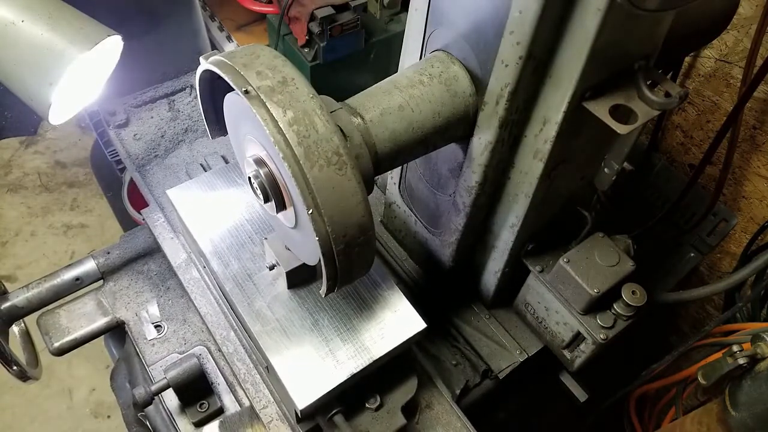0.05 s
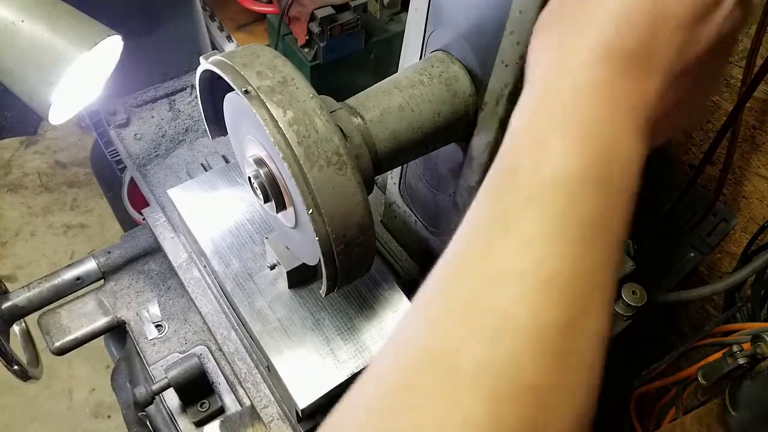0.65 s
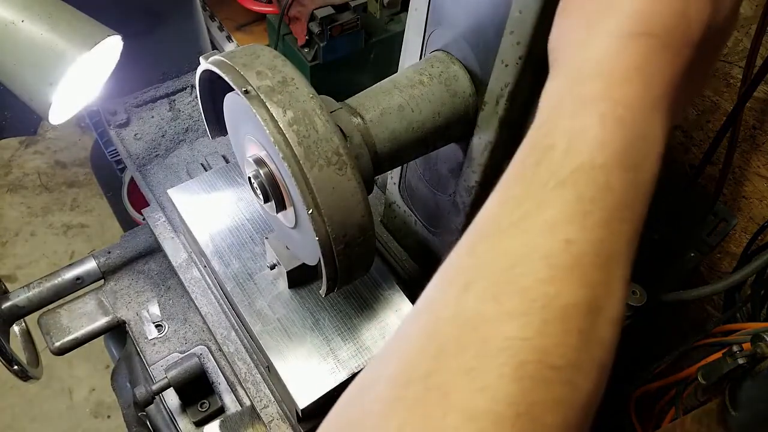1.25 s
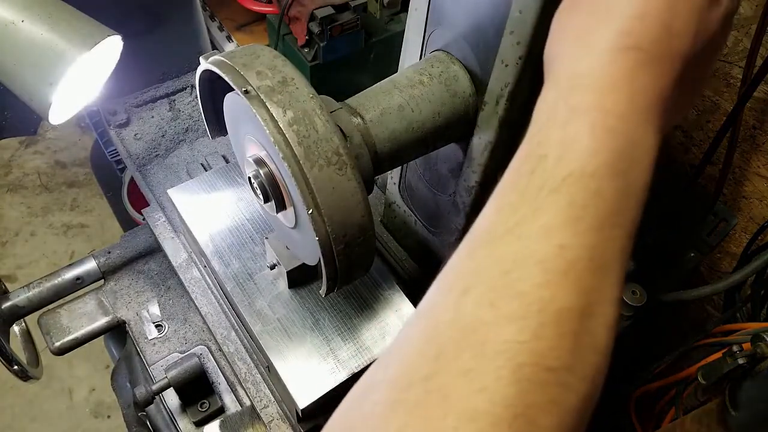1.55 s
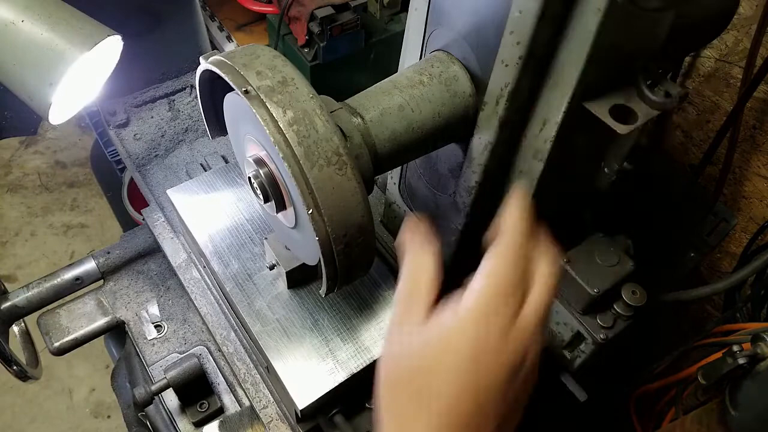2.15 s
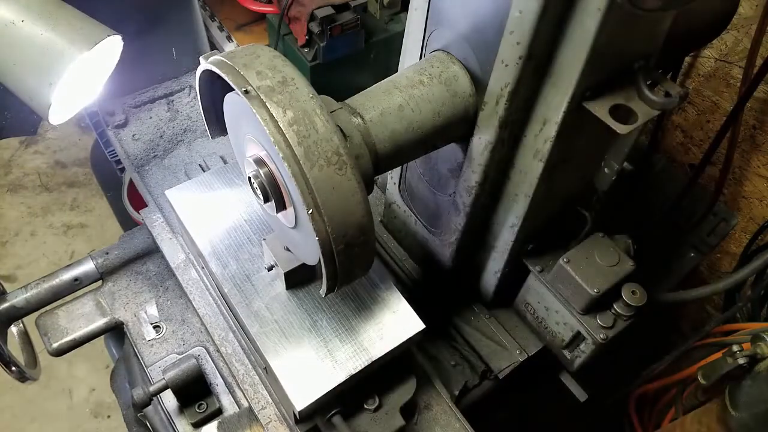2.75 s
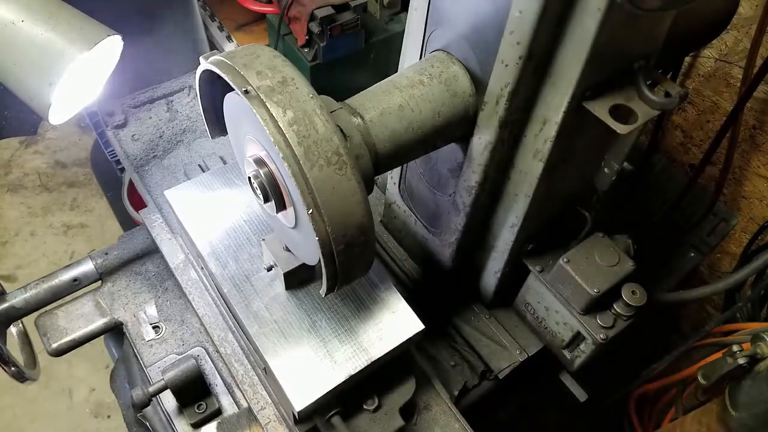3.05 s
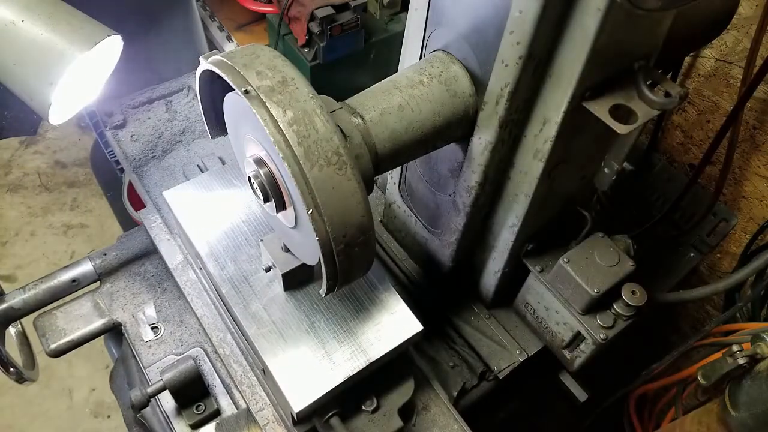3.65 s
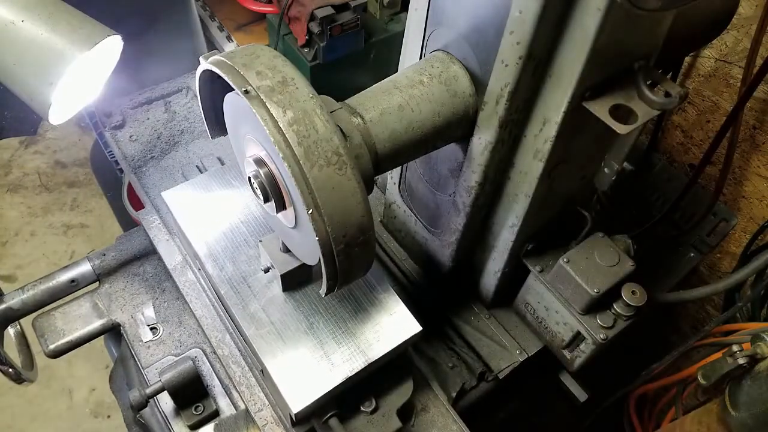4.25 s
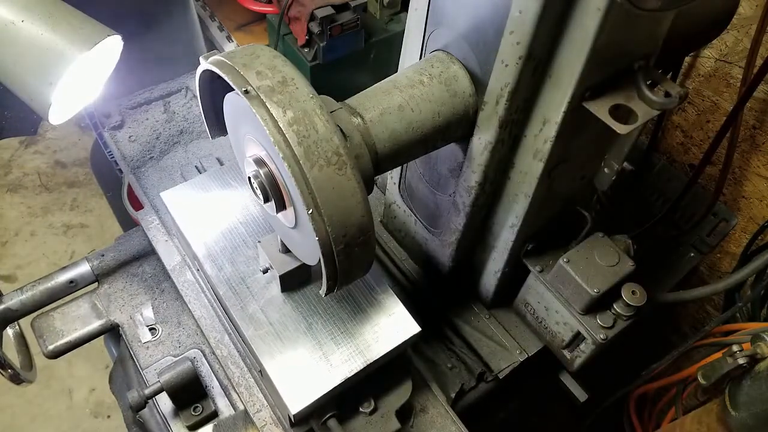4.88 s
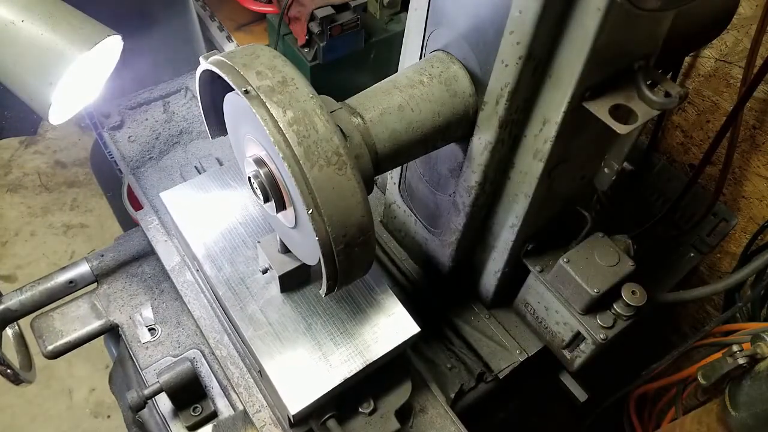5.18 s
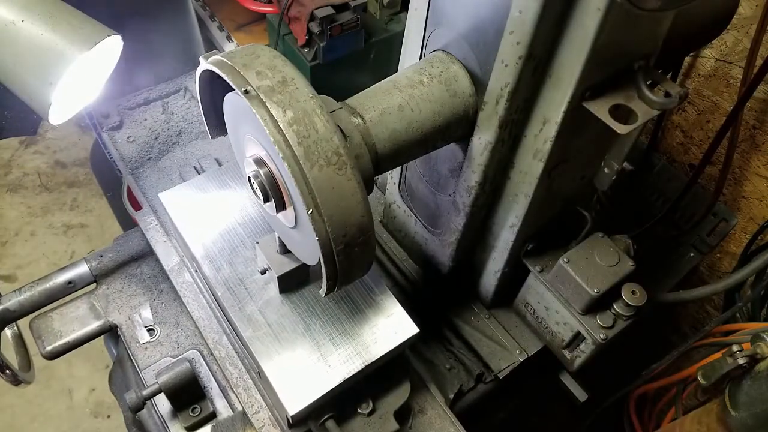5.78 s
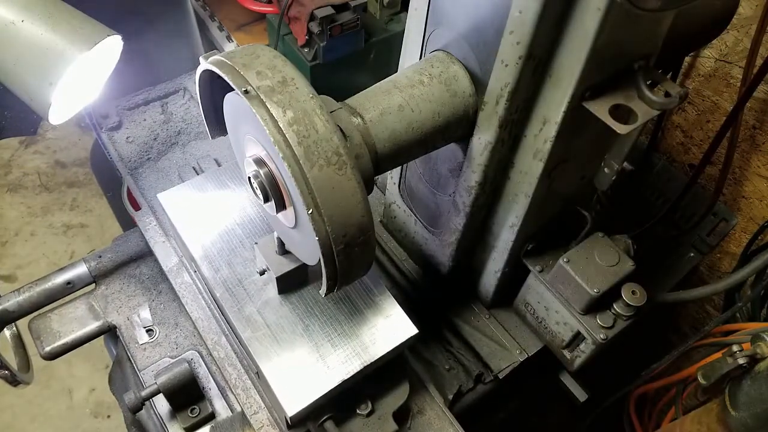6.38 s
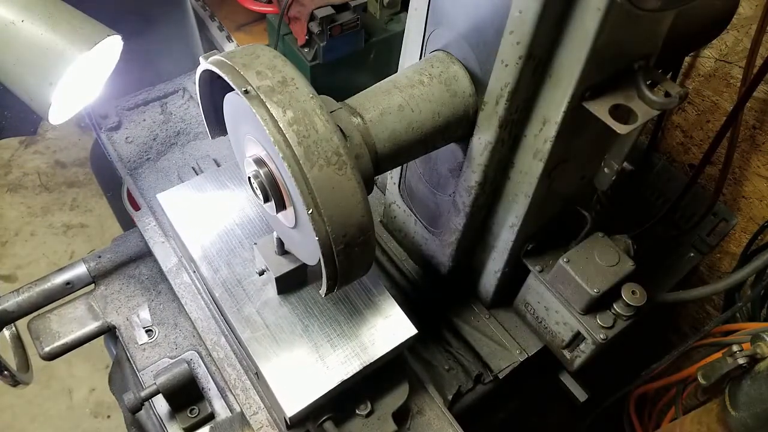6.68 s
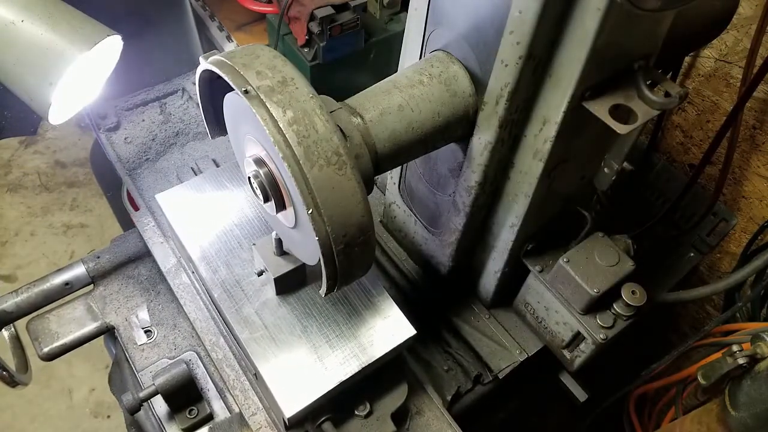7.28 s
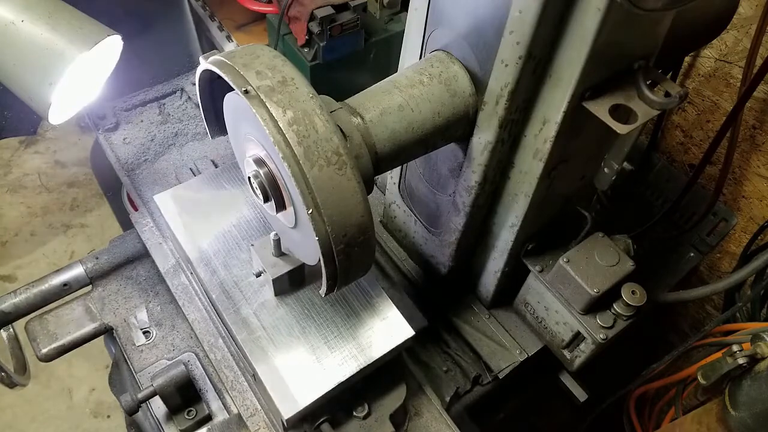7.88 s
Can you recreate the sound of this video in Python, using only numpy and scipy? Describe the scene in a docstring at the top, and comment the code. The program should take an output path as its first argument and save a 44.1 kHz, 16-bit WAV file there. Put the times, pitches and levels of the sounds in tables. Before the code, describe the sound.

A grinding wheel catches steel, hissing and ringing shrilly for about five seconds, with the machine's steady motor hum before and after.

```python
"""A surface grinder makes one pass over a steel plate, close to two microphones.
It idles first: the motor hums on mains harmonics, the spindle whirrs and its bearings whine.
At 2.4 s the wheel catches the plate with a zing. Its grit then hisses, shakes the table and sets
the steel ringing; six shrill modes surge and fade. At 7.2 s the wheel runs off and the machine idles."""
import sys
import numpy as np
from scipy import signal
from scipy.fft import rfft, irfft, next_fast_len
from scipy.io import wavfile
from scipy.ndimage import uniform_filter1d

SR = 44100
rng = np.random.default_rng(int(sys.argv[2]) if len(sys.argv) > 2 else 0)


def master_out(mix):
    """Clip the mix to full scale and print it as 16-bit PCM to the path in sys.argv[1]."""
    frames = np.transpose(np.atleast_2d(mix))
    ceiling = np.clip(frames, -1, 1)
    pcm = np.round(ceiling * 32767).astype(np.int16)
    wavfile.write(sys.argv[1], SR, pcm)


N = 353838
T = np.arange(N) / SR
SLOW_T = np.linspace(0, N / SR, 512)  # envelope grid [s]
FFT_SIZE = next_fast_len(N, True)
BINS_HZ = np.fft.rfftfreq(FFT_SIZE, 1 / SR)
MAINS_HZ, WHEEL_HZ = 59.93, 59.865
MEET_S, RUN_OFF_S = 2.444, 7.24


def amp(db):
    """Decibels to gain."""
    return np.exp(np.asarray(db) * (np.log(10) / 20))


def unit_rms(x):
    """Scale to rms 1."""
    return x / np.sqrt(np.mean(abs(x) ** 2) + 1e-20)


def over_time(rows):
    """One linearly interpolated curve per column after the time."""
    times_s, *columns = np.transpose(rows)
    return [np.interp(T, times_s, column) for column in columns]


def over_bins(rows):
    """Interpolate (frequency [Hz], value) on a log axis."""
    hz, value = np.transpose(rows)
    return np.interp(np.log(BINS_HZ + 1), np.log(hz + 1), value)


def pan(db):
    """Left and right gains of mean power 1; positive is left."""
    return unit_rms(amp(np.array([[db], [-db]]) / 2))


def drift(corner_hz, at=T):
    """Smooth random curve, rms about 1."""
    frames = 4096
    hz = np.fft.rfftfreq(frames, N / SR / frames)
    smooth = irfft(rfft(rng.standard_normal(frames)) / (1 + (hz / corner_hz) ** 2))
    return np.interp(at, np.linspace(0, N / SR, frames), unit_rms(smooth))


def swell(centre_s, length_s, at=T):
    """Rounded bump of height 1, length_s wide at half height."""
    return .5 ** (abs(2 * (at - centre_s) / length_s) ** 2.7)


def tones(lines):
    """Sum of tones, each (frequency [Hz], complex stereo rms envelope on SLOW_T)."""
    frames = len(SLOW_T)
    offsets = np.round(np.fft.fftfreq(frames) * frames).astype(int)
    spectrum = np.zeros((2, len(BINS_HZ)), complex)
    for hz, envelope in lines:
        spectrum[:, round(hz * FFT_SIZE / SR) + offsets] += np.fft.fft(envelope) / frames
    return irfft(spectrum, FFT_SIZE)[:, :N] * FFT_SIZE / np.sqrt(2)


def rush(colour, resonances=(), pan_db=0, repeat=0, keep=.6):
    """Coloured stereo noise, rms 1; the share `repeat` recurs each wheel turn, scaled by `keep`."""
    # likeness of the microphones: (frequency [Hz], correlation)
    likeness = [(30, 0.6), (70, 0.99), (200, 1), (410, 0.99), (530, 1), (700, 0.13), (950, -0.013),
                (2300, -0.14), (4000, -0.11), (8000, 0.057)]
    comb = (1 - keep ** 2) / (1 - 2 * keep * np.cos(2 * np.pi * BINS_HZ / WHEEL_HZ) + keep ** 2)
    gain = amp(over_bins(colour)) * np.sqrt(1 - repeat + repeat * comb)
    for hz, width_hz, lift_db in resonances:
        gain *= np.sqrt(1 + (amp(lift_db) ** 2 - 1) / (1 + (2 * (BINS_HZ - hz) / width_hz) ** 2))
    left, independent = rfft(rng.standard_normal((2, FFT_SIZE)))
    correlation = over_bins(likeness)
    right = correlation * left + np.sqrt(1 - correlation ** 2) * independent
    pair = np.array([left * amp(pan_db / 2), right / amp(pan_db / 2)])
    return unit_rms(irfft(gain * pair, FFT_SIZE)[:, :N])


def ring(force, hz, width_hz):
    """One damped mode, rms 1."""
    r = np.exp(-np.pi * width_hz / SR)
    return unit_rms(signal.lfilter([1, 0, -1], [1, -2 * r * np.cos(2 * np.pi * hz / SR), r * r], force))


def patchy(x, depth_db, width_hz=900, length_s=.07):
    """Narrow bands of a noise rise and fall independently."""
    spectra = signal.stft(x, nperseg=512)[2]
    bins, frames = round(width_hz * 512 / SR), round(length_s * SR / 256)
    patches = uniform_filter1d(rng.standard_normal(spectra.shape[1:]), bins, 0)
    patches = unit_rms(uniform_filter1d(patches, frames, 1))
    return signal.istft(spectra * amp(depth_db * patches), nperseg=512)[1][:, :N]


def air(db=-54):
    """Faint, even hiss."""
    return amp(db) * rush([(1000, -12), (8000, -5), (15800, 4)])


def rumble(lumps_db=3):
    """Faint, lumpy rumble."""
    # rumble strength: (time [s], level [dB])
    levels = [(0, -50.5), (.7, -57), (1.8, -58), (2.5, -62), (5.55, -70), (5.65, -52), (6.8, -60),
              (7.5, -51), (8, -60)]
    level_db, = over_time(levels)
    colour = [(10, -8), (25, -13), (55, 7), (90, 3), (250, -41), (2000, -80)]
    return amp(level_db + lumps_db * drift(6.4)) * rush(colour)


def motor_hum(gain_db=-49, waver_db=2.5, blur_rad=0.19):
    """Magnetic hum; higher mains harmonics waver more and differ between the microphones."""
    # hum spectrum: (harmonic, level [dB])
    harmonics = [(1, -41), (2, 2), (3, -18), (4, -15), (5, -8.5), (6, -6.5), (7, -21), (8, -27), (9, -7.5),
                 (10, -9.5), (11, -12.5), (12, -3.5), (13, -9), (14, -30), (15, -29)]
    # harmonics swell as the table travels: (time [s], harmonic, length [s], lift [dB])
    swells = [(.5, 4, 1.9, 12.5), (1.6, 3, 0.79, 11), (2.797, 6, 0.4, 15.5), (2.953, 12, 0.73, 5.5),
              (4.34, 12, 1.75, 11.5), (6.3, 12, 1.6, 6.5), (4.45, 6, 1.6, 11), (4.5, 2, 1.9, 2.5),
              (4.6, 5, 1.64, 14.5), (5.053, 4, 1.4, 17), (7.844, 4, 0.75, 13.5), (7.9, 6, 0.62, 4)]
    lines = []
    for k, harmonic_db in harmonics:
        phase = 2 * np.pi * rng.random() + blur_rad * np.sqrt(k) * drift(8.8, SLOW_T)
        apart_rad = np.array([[0], [0.0082 + 0.28 * min(k / 10, 1) ** 2]])
        swell_db = sum(lift * swell(s, length, SLOW_T) for s, order, length, lift in swells if order == k)
        level_db = gain_db + harmonic_db + swell_db + waver_db * np.sqrt(k / 8) * drift(11, SLOW_T)
        lines.append((k * MAINS_HZ, amp(level_db) * np.exp(1j * (phase + apart_rad))))
    return tones(lines)


def rotor(gain_db=0.5, waver_db=3.3, blur_rad=0.62):
    """Rotor and fan add low tones between the mains harmonics."""
    # rotor and fan tones: (frequency [Hz], level [dB])
    partials = [(177.6, -64.5), (242.2, -62.5), (269.2, -63), (328, -62), (532.9, -53), (559.9, -53),
                (750, -56), (807.5, -58), (838, -59), (866.7, -53), (885, -60), (909, -62), (1082, -53),
                (1147, -58)]
    lines = []
    for hz, line_db in partials:
        phase = 2 * np.pi * rng.random() + blur_rad * drift(9.2, SLOW_T)
        apart_rad = np.array([[0], [2 * min(hz / 800, 1) ** 2]])
        level_db = gain_db + line_db + waver_db * drift(8.2, SLOW_T)
        lines.append((hz, amp(level_db) * np.exp(1j * (phase + apart_rad))))
    return tones(lines)


def whirr(gain_db=-34):
    """Rolling noise and wheel air, heard through the housing."""
    # whirr spectrum: (frequency [Hz], relative density [dB])
    colour = [(30, -41), (110, -10.5), (180, -11), (350, -8), (1000, -7), (1800, -6), (2200, -10),
              (2420, -9), (2900, -10), (3900, -9.5), (5000, -14.5), (7300, -14.5), (8050, -19), (8350, -26),
              (15800, -27)]
    # housing and wheel guard resonances: (frequency [Hz], width [Hz], lift [dB])
    housing = [(582, 76, 1.5), (733, 130, 3.5), (1970, 91, 4.5), (2194, 34, 2)]
    return amp(gain_db) * rush(colour, housing, pan_db=1, repeat=0.11, keep=0.88)


def bearings(gain_db=-0.32, waver_db=2.33, wander_s=3e-5, blur_rad=0.39, rough_db=1, pan_spread_db=3):
    """Whining lines that all follow the shaft's wander and the roughness of the races."""
    # whine: (frequency [Hz], level [dB], left-right [dB], phase between microphones [rad])
    whine = [(1231.8, -42.6, 5, -0.2), (1351.5, -48.2, -1, 1.6), (1425.2, -48.1, -2, 0.2),
             (1656.5, -47.2, 11, -2.0), (1680.5, -47.2, -1, -0.8), (1877.4, -47.3, 1, -2.7),
             (1913.4, -44.4, 8, -1.2), (1961.5, -44.4, 2, -1.3), (1985.8, -48.4, -1, 1.9),
             (1997.2, -49.2, -1, 2.4), (2164.4, -47.4, 7, 1.8), (2200.4, -44.6, 7, 0.8),
             (2218.3, -46.5, 2, 1.2), (2236.4, -39, -3, -0.5), (2266.4, -47.6, -1, -1.1),
             (2284.5, -48.1, 10, -0.5), (2607.2, -46.5, 6, -2.3), (2643.2, -44.3, 0, -2.4),
             (3512.9, -47.5, -4, -2.8), (3527.7, -48.2, -7, 2.7), (3850.7, -48.2, 3, -2.7)]
    # faint whine lines, each placed at random between the microphones: (frequency [Hz], level [dB])
    faint_whine = [(1267, -55), (1297, -55), (1320, -54), (1377, -51), (1555, -52), (1614, -51),
                   (1638, -51), (1708, -53), (1842, -53), (1901, -51), (1939, -50), (1949, -50),
                   (2033, -51), (2186, -53), (2320, -51), (2488, -55), (2621, -51), (2810, -56),
                   (2827, -58), (2876, -58), (3461, -54), (3576, -54), (3618, -55), (3667, -56),
                   (3747, -51), (3779, -53), (3899, -49), (4179, -54), (4496, -56), (5349, -61),
                   (5581, -59), (5653, -61), (5862, -57), (6142, -61), (6214, -60), (7263, -57.5),
                   (7311, -59), (7800, -59), (7896, -62)]
    # flares of the strongest line: (time [s], length [s], lift [dB])
    flares = [(0.42, 0.041, 9), (2.24, 0.13, 5)]
    strongest_db = max(row[1] for row in whine)
    lead_s = wander_s * drift(0.73, SLOW_T)
    placed = [(hz, db, pan_spread_db * rng.standard_normal(), 2 * np.pi * rng.random())
              for hz, db in faint_whine]
    lines = []
    for hz, level_db, pan_db, apart_rad in list(whine) + placed:
        phase = 2 * np.pi * (hz * lead_s + rng.random()) + blur_rad * drift(16, SLOW_T)
        phase = phase + np.array([[0], [apart_rad]])
        if level_db == strongest_db:
            level_db += sum(lift * swell(s, length, SLOW_T) for s, length, lift in flares)
        envelope = amp(level_db + waver_db * drift(48, SLOW_T)) * pan(pan_db)
        lines.append((hz, envelope * np.exp(1j * phase)))
    return amp(gain_db + rough_db * drift(20)) * tones(lines)


def spindle():
    """The running spindle: whirr and whine slowly change in level."""
    # spindle levels: (time [s], whirr gain [dB], whine gain [dB])
    gains = [(0, 0.5, -0.5), (2.2, 1.3, 0.5), (3.5, 3, 0), (4.5, 0.5, 0), (6.5, -5.5, -3), (7.3, -3, -4.5),
             (8, -2.5, -3)]
    whirr_db, whine_db = over_time(gains)
    return amp(whirr_db) * whirr() + amp(whine_db) * bearings()


def contact(rise_s=0.17, decay_s=.075):
    """Wheel on plate, 0-1: builds as it bites, dies as it runs off, with these time constants."""
    bite = 1 - np.exp(-np.maximum(T - MEET_S, 0) / rise_s)
    return bite * np.exp(-np.maximum(T - RUN_OFF_S, 0) / decay_s)


def excitation(decay_s=0.027):
    """How strongly the cut keeps the steel ringing, 0-1; lags the contact."""
    return contact(rise_s=0.66, decay_s=decay_s)


def grit_gain(runout_db=-0.1, rough_db=0.9):
    """The wheel's bite rises once a turn and varies quickly as grains strike."""
    grains = drift(200)
    grains -= uniform_filter1d(grains, round(SR / WHEEL_HZ))  # even from turn to turn
    return amp(runout_db * np.sin(2 * np.pi * WHEEL_HZ * T) + rough_db * grains)


def first_bite(gain_db=-43, hz=10400, width_hz=420, fade_db_per_s=5):
    """The plate's edge zings as the wheel catches it, and fades as the contact widens."""
    zing = ring(ring(rng.standard_normal((2, N)), hz, width_hz), hz, width_hz)
    return amp(gain_db - fade_db_per_s * (T - MEET_S)) * contact(rise_s=.06) * zing


def steel_ringing(gain_db=1.36, waver_db=2.5):
    """Damped modes of the steel, kept ringing by random blows of the grit."""
    # grit-driven modes: (frequency [Hz], width [Hz], level [dB])
    modes = [(6528, 8, -52), (6584, 7, -42.5), (6622, 14, -46), (6642, 10, -43), (6706, 7, -49),
             (7008, 7, -50), (7064, 11, -45.5), (7097, 12, -46), (7127, 7, -45), (7186, 8, -50),
             (15208, 10, -43.5)]
    # a mode is briefly struck harder: (time [s], mode [Hz], length [s], lift [dB])
    flares = [(2.93, 7097, .15, 7), (5.79, 15208, .17, 9), (6.615, 7127, .06, 11)]
    out = np.zeros((2, N))
    for hz, width_hz, mode_db in modes:
        flare_db = sum(lift * swell(s, length) for s, mode_hz, length, lift in flares if mode_hz == hz)
        level_db = gain_db + mode_db + flare_db + waver_db * drift(7.2)
        out += amp(level_db) * ring(rng.standard_normal((2, N)), hz, width_hz)
    return pan(db=1) * excitation() * grit_gain() * out


def cut(hiss_db=15, roar_db=7.5, shudder_db=-10, bite_db=1.26):
    """Grit tears steel: a hiss that recurs each turn; the table roars and shudders, the chuck drones."""
    # wheel load: (time [s], grit contact [dB], push on the table [dB])
    load = [(2.6, -45, -38), (3.1, -43, -39), (4.2, -42.5, -37), (4.7, -42.5, -38), (5.3, -40.5, -37),
            (6.1, -42.5, -39), (6.7, -42, -38.5), (7.2, -46.5, -44)]
    # grit hiss: (frequency [Hz], relative density [dB])
    hiss_colour = [(1200, -13.5), (2600, -6), (3400, 7.5), (4250, 8.5), (4500, 2.5), (5100, -7), (6200, 0),
                   (6850, 5), (7700, -4), (9400, -6.5), (10100, 5), (11150, 5), (11500, 0), (13900, -1),
                   (14400, 9.5), (15800, 5.5)]
    # table roar: (frequency [Hz], relative density [dB])
    roar_colour = [(60, -35), (170, -23), (320, -33), (480, 0.5), (750, 3.5), (1000, 4), (1400, 6),
                   (2100, 4.5), (2700, 11.5), (4500, -50)]
    # table and chuck resonances: (frequency [Hz], width [Hz], lift [dB])
    chuck = [(536.5, 34, 13), (748, 78, 5.5), (823, 24, 9), (1240, 560, 7), (1667, 34, 7.5),
             (2020, 150, 6.5), (2116, 89, 7), (2500, 63, 4.5)]
    # deep table shudder: (frequency [Hz], relative density [dB])
    shudder_colour = [(50, -29), (120, 7), (200, 1), (280, 5.5), (350, 6), (450, 7), (800, -36)]
    # swells of the chuck's drone: (time [s], length [s], level [dB])
    drones = [(3.137, 0.54, -38), (3.708, 0.32, -38), (4.192, 0.18, -40), (5.304, 0.73, -42.5),
              (6.63, 1, -44)]
    grit_db, push_db = over_time(load)
    # the top of the hiss beams left
    beam_db = over_bins([(4000, 2), (8000, 1), (11000, 0), (13000, -3), (15500, 5)])
    hiss = patchy(rush(hiss_colour, pan_db=beam_db, repeat=0.46, keep=0.57), depth_db=3.1)
    hiss *= amp(hiss_db + grit_db) * grit_gain()
    roar = rush(roar_colour, chuck, repeat=0.19, keep=0.7) * amp(roar_db + bite_db * drift(45))
    shudder = amp(shudder_db) * rush(shudder_colour)
    drone = ring(rng.standard_normal(N), hz=400.9, width_hz=9.3)
    drone *= sum(amp(db) * swell(s, length) for s, length, db in drones)
    return contact() * (hiss + amp(push_db) * (roar + shudder)) + drone


def squeal(gain_db=3, waver_db=1.8, blur_rad=0.18, echo_rad=0.6, fade_db=2, dropout_db=-10, ref_s=3.77):
    """Six nearly self-sustaining steel modes surge, dip and flutter with each turn of the wheel."""
    # mode: (frequency [Hz], left-right [dB], phase between microphones [rad], noise share, flutter depth)
    modes = {"low": (3892.8, 8.5, -.3, .008, .12), "second": (4250, -7, 2.6, .03, .22),
             "middle": (9877, -2, 1.3, .08, .2), "upper": (10477, -1, 1.8, .3, .3),
             "high": (13532, 12, .8, .2, .13), "top": (14246, 9, -.3, .45, .2)}
    # soft sound between surges, mode: (level at ref_s [dB], growth [dB/s], ring-out [s])
    simmers = {"low": (-32, -0.11, 0.026), "second": (-35.5, 0.88, 0.069), "middle": (-45.5, .2, 0.023),
               "upper": (-45.5, 2.5, 0.028), "high": (-41.5, 3.1, 0.04), "top": (-43, .8, .04)}
    # a mode locks on to the wheel: (time [s], mode, length [s], level [dB])
    surges = [(2.745, "low", 0.053, -36), (2.773, "second", 0.087, -35.3), (2.918, "high", .156, -37),
              (2.986, "low", 0.098, -28), (3.152, "high", .061, -31), (3.205, "second", 0.17, -29.5),
              (3.594, "high", 0.31, -31), (3.743, "upper", 0.12, -38), (3.787, "second", 0.068, -31),
              (3.889, "middle", .087, -39.5), (3.94, "top", 0.031, -37), (4.032, "low", 0.044, -28.5),
              (4.197, "second", .19, -33), (4.212, "high", .284, -34), (4.23, "low", 0.11, -24.5),
              (4.357, "second", 0.11, -28.5), (4.36, "low", 0.075, -24.5), (4.375, "high", .057, -32),
              (4.52, "low", 0.44, -25.5), (4.58, "second", 0.28, -26.5), (4.86, "high", 0.24, -35),
              (4.88, "low", 0.14, -25.5), (5.106, "low", 0.18, -25.5), (5.154, "middle", 0.094, -34),
              (5.2, "top", .065, -27), (5.22, "second", .043, -28), (5.222, "high", 0.14, -27),
              (5.275, "low", 0.052, -28), (5.458, "low", 0.066, -26.5), (5.453, "high", .078, -32),
              (5.494, "middle", 0.053, -36), (5.516, "top", .16, -29), (5.564, "high", 0.11, -26),
              (5.569, "low", 0.13, -18.5), (5.595, "second", .151, -36), (5.681, "high", 0.07, -27),
              (5.71, "second", 0.054, -26.5), (5.724, "low", .053, -28.4), (5.79, "upper", 0.22, -33.5),
              (5.95, "middle", .112, -34), (5.974, "second", 0.062, -30), (6.003, "high", 0.13, -24.5),
              (6.081, "top", .3, -34), (6.147, "high", .049, -29.7), (6.17, "second", 0.064, -32.5),
              (6.207, "high", .04, -28.5), (6.3, "low", 0.13, -24.5), (6.42, "second", 0.13, -33),
              (6.438, "top", .072, -32), (6.464, "high", .061, -27), (6.48, "low", .115, -24.5),
              (6.52, "top", .061, -26), (6.602, "middle", 0.28, -34.3), (6.661, "second", 0.38, -27),
              (6.686, "top", .062, -29.6), (6.721, "low", 0.088, -24), (6.88, "second", .06, -33),
              (6.97, "high", 0.2, -21.5), (6.971, "top", .212, -36), (7.05, "upper", .12, -40),
              (7.053, "middle", 0.26, -37.5), (7.249, "high", .072, -31), (7.355, "low", 0.062, -43)]
    # a mode loses its lock: (time [s], mode, length [s])
    dropouts = [(2.846, "low", 0.13), (3.066, "low", 0.03), (3.218, "low", 0.075), (3.522, "high", 0.044),
                (3.636, "low", 0.066), (3.785, "low", 0.14), (4.07, "second", 0.098), (4.296, "low", 0.013),
                (4.745, "low", 0.028), (4.95, "second", 0.22), (5.037, "top", .15), (5.328, "low", 0.029),
                (5.95, "low", .038), (6.14, "low", 0.031), (6.402, "low", .039), (6.814, "second", 0.043),
                (6.89, "upper", .056), (7.012, "second", 0.13), (7.222, "second", 0.06),
                (7.238, "upper", 0.17)]
    turn_rad = 2 * np.pi * WHEEL_HZ * T
    throb = np.sin(turn_rad + drift(7)) + 0.11 * np.sin(2 * turn_rad + drift(3))
    out = np.zeros((2, N))
    for name, (hz, pan_db, apart_rad, noise_share, flutter) in modes.items():
        simmer_db, db_per_s, ring_out_s = simmers[name]
        simmer = excitation(ring_out_s) * amp(simmer_db + db_per_s * (T - ref_s) + waver_db * drift(21))
        surge_power = sum((amp(db) * swell(s, length, SLOW_T)) ** 2
                          for s, mode, length, db in surges if mode == name)
        dips = [swell(s, length, SLOW_T) for s, mode, length in dropouts if mode == name]
        dip_gain = amp(dropout_db * sum(dips, np.zeros_like(SLOW_T)))
        envelope = np.sqrt(simmer ** 2 + np.interp(T, SLOW_T, surge_power))
        envelope *= np.interp(T, SLOW_T, dip_gain)
        phase = blur_rad * drift(14, SLOW_T) + np.array([[0], [apart_rad]])
        # the plate travels: each microphone hears its own shifting reflections
        phase += echo_rad * np.array([drift(0.89, SLOW_T), drift(3.4, SLOW_T)])
        weaker_side = np.array([[pan_db < 0], [pan_db > 0]])
        fading = amp(fade_db * drift(12, SLOW_T) * weaker_side)
        tone = tones([(hz, fading * np.exp(1j * phase))])
        noise = ring(rng.standard_normal((2, N)), hz, width_hz=11)
        voice = np.sqrt(1 - noise_share) * tone + np.sqrt(noise_share) * noise
        out += amp(gain_db) * envelope * (1 + flutter * throb) * pan(pan_db) * voice
    return out


def scene():
    """The running machine, with the pass on top."""
    machine = motor_hum() + rotor() + rumble() + spindle()
    grinding = first_bite() + cut() + squeal() + steel_ringing()
    return machine + grinding + air()


def record(dry):
    """Steep low-pass."""
    edge_hz = 15720
    taps = signal.firwin(511, edge_hz, window=("kaiser", 9), fs=SR)
    return signal.oaconvolve(dry, taps[None], "same")


dry = scene()
out = record(dry)
master_out(out)
```